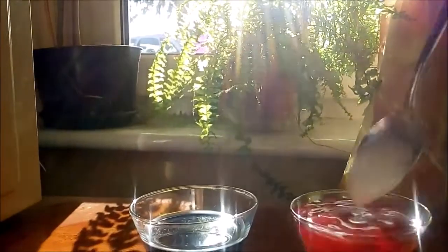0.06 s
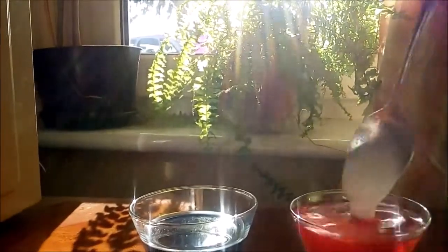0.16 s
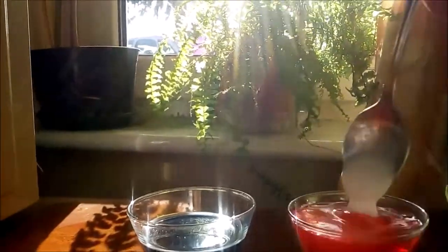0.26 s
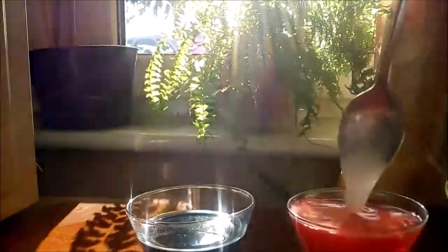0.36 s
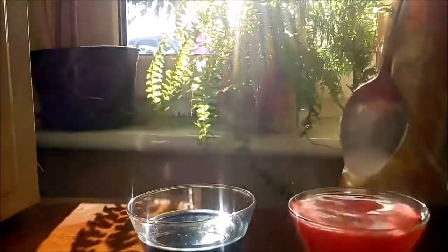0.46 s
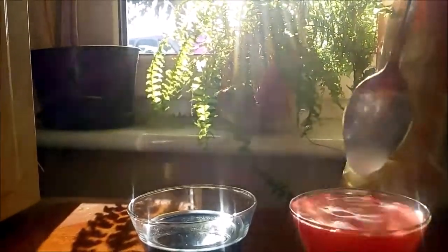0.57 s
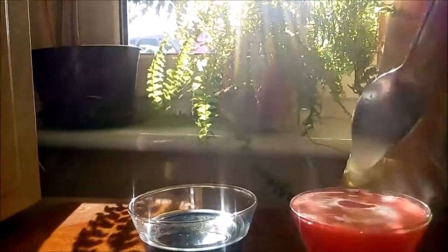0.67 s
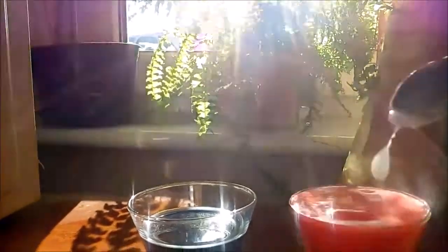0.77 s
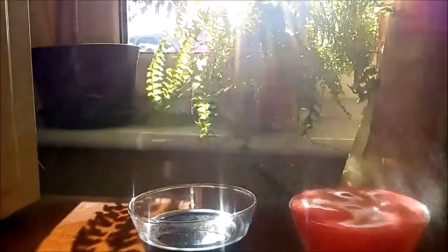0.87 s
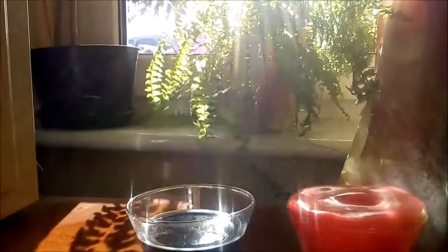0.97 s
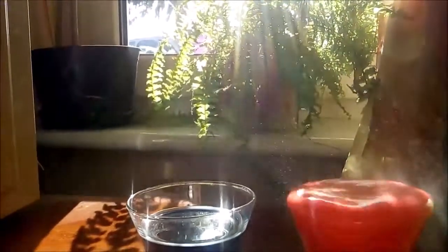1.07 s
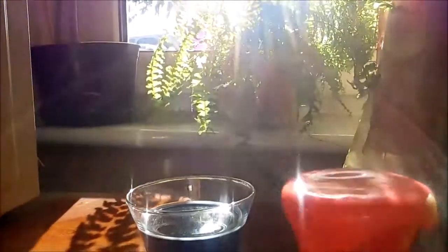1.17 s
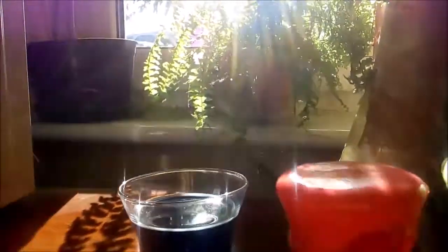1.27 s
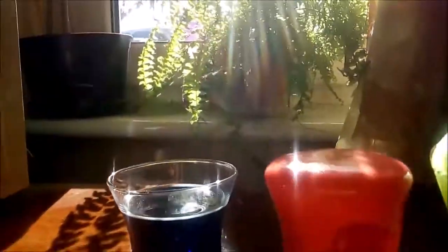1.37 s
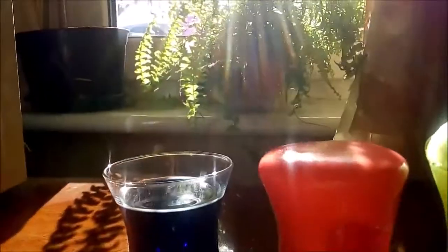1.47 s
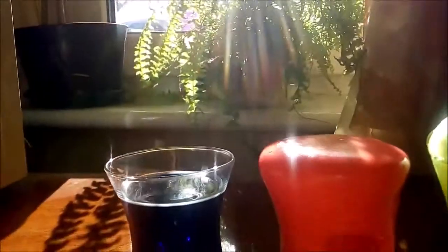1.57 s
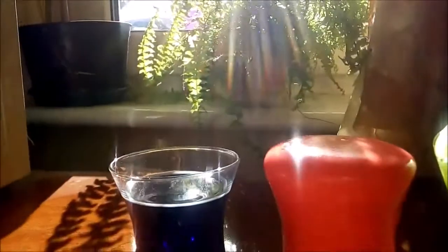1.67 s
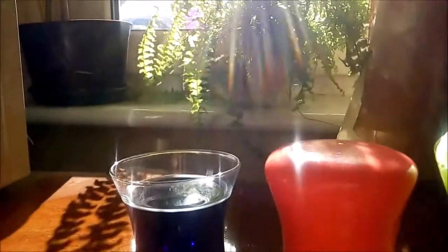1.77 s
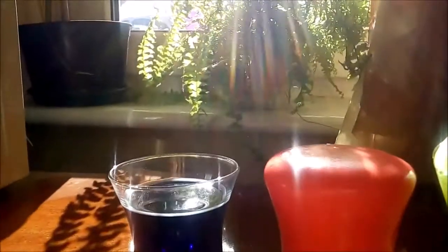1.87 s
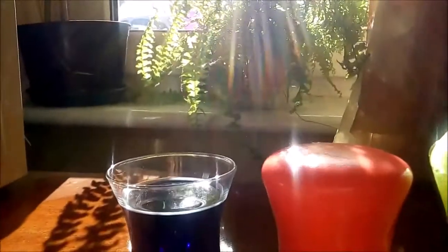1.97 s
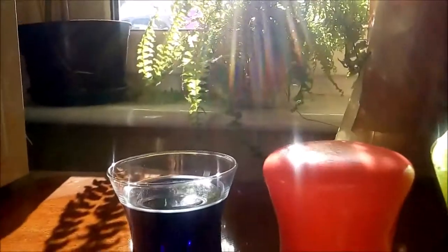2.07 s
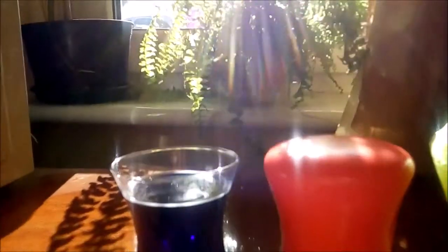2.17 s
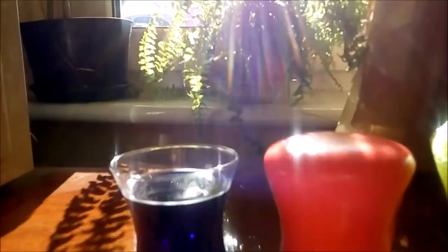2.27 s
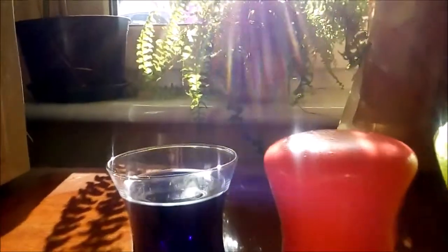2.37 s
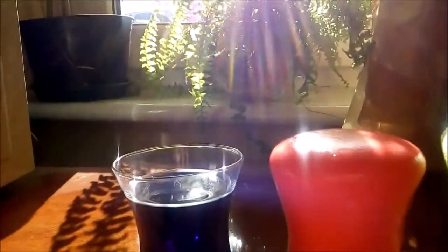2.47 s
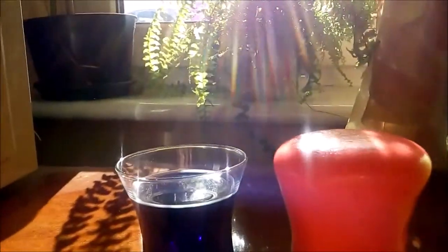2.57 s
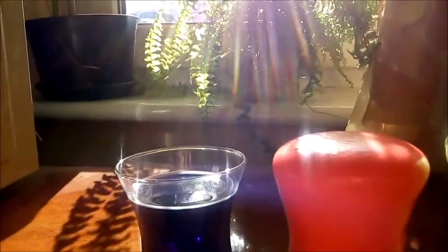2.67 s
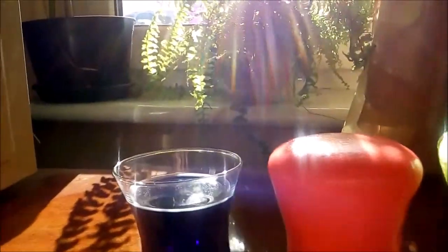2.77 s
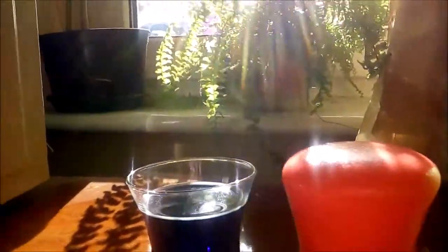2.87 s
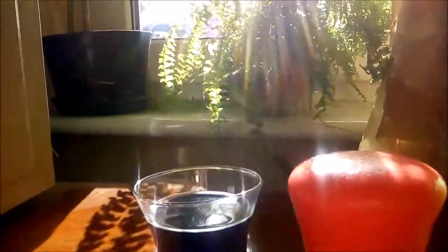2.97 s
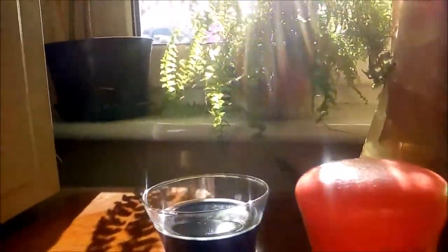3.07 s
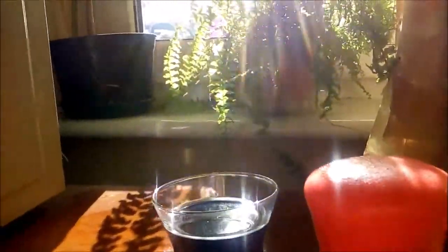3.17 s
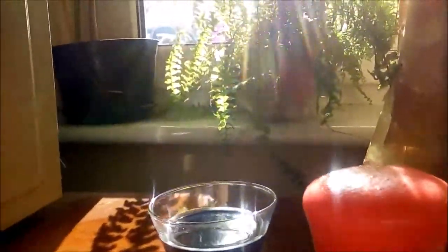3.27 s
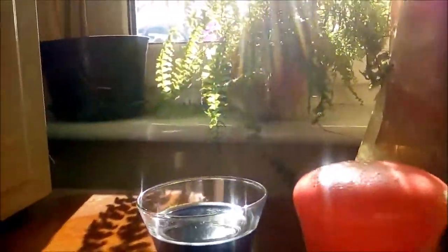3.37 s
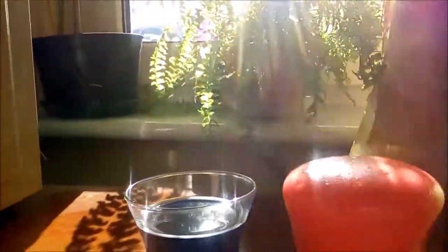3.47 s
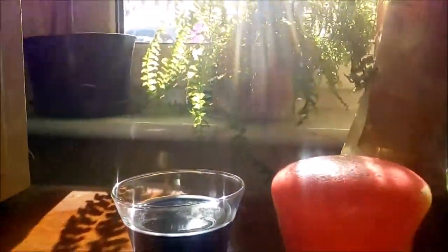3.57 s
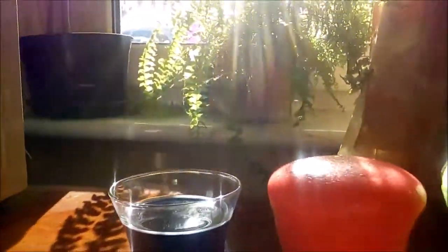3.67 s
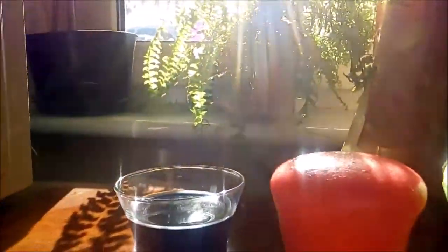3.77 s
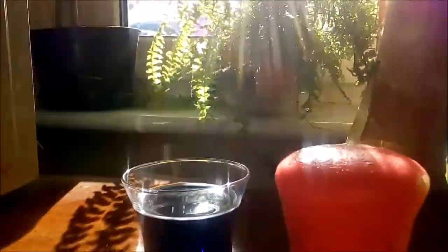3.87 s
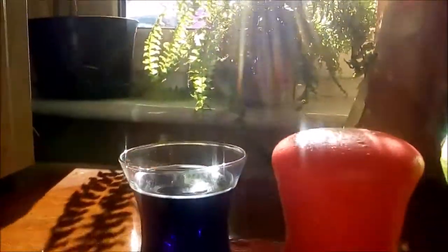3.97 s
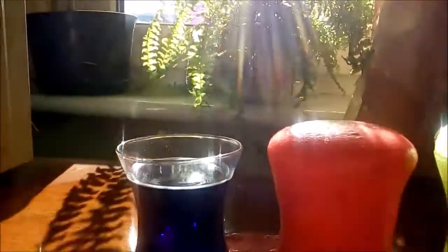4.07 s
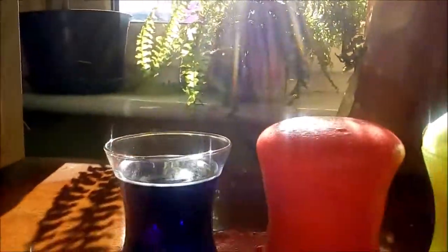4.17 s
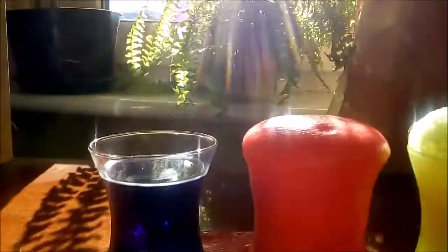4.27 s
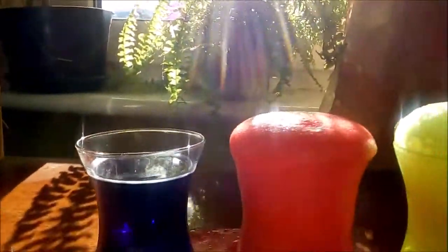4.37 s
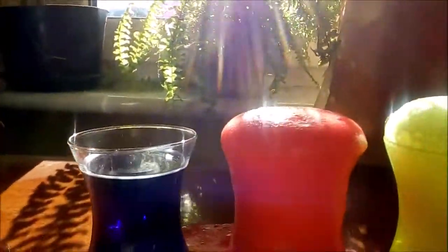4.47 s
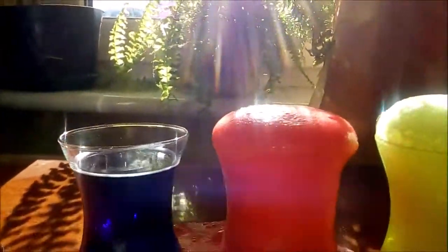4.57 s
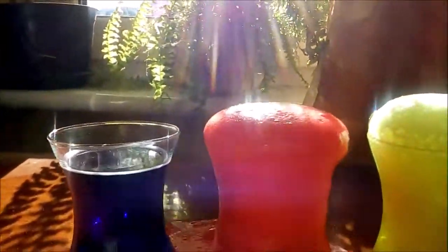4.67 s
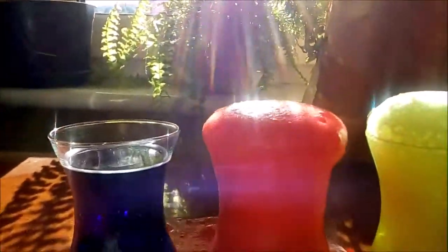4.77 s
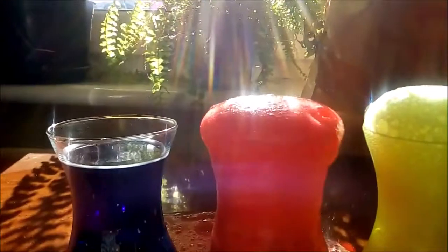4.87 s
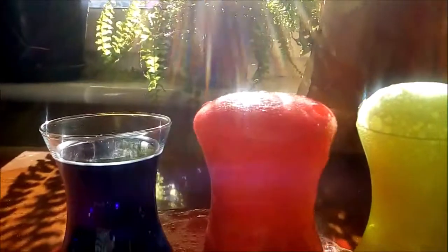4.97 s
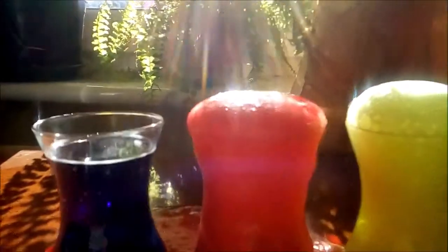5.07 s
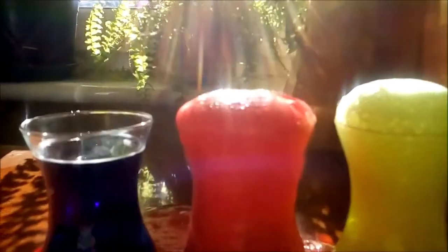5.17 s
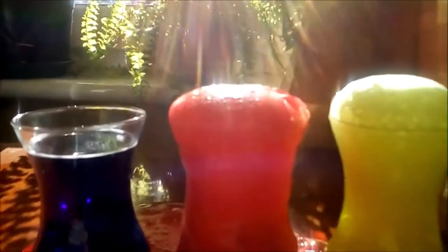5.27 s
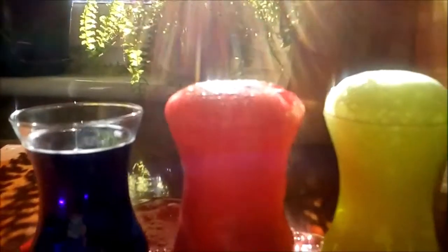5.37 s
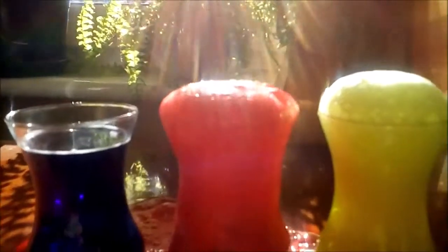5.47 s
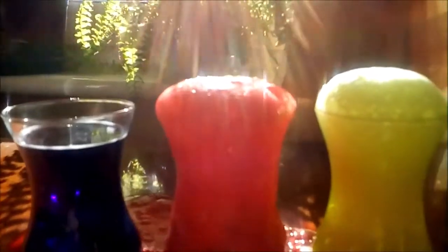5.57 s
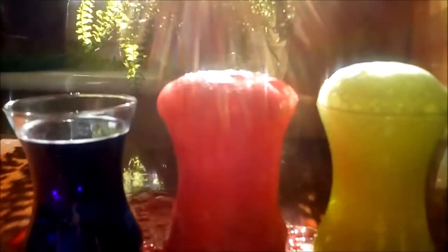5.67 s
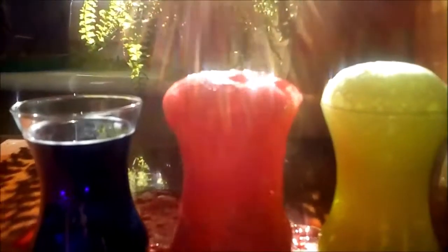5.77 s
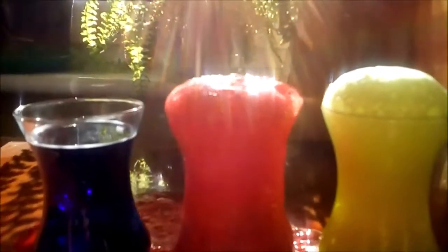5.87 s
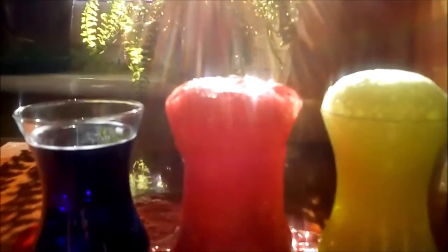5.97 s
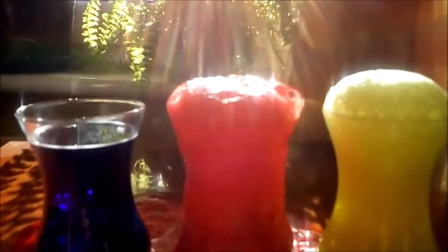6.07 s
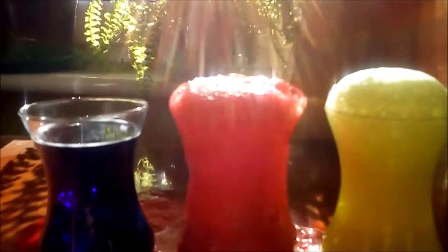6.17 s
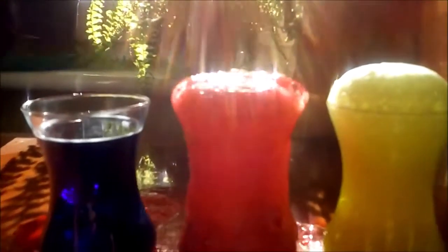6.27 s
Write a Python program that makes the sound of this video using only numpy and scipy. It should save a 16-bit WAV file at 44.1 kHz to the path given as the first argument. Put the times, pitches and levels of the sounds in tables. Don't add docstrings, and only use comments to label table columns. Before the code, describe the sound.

Powder makes liquid foam over with a dense bubbly hiss, while a spoon clatters on wood and fingers bump the camera in a quiet room.

```python
import sys
import numpy as np
from scipy import signal
from scipy.fft import rfft, irfft
from scipy.io import wavfile
from scipy.ndimage import uniform_filter1d

SR = 44100
rng = np.random.default_rng(int(sys.argv[2]) if len(sys.argv) > 2 else 0)


def store_wav(level_fs):
    pcm = np.round(np.clip(np.atleast_2d(level_fs), -1, 1) * 32767)
    wavfile.write(sys.argv[1], SR, pcm.T.astype(np.int16))


def linear_from_db(decibels):
    return 10 ** (np.asarray(decibels, float) / 20)


N = 278712
T = np.arange(N) / SR

# pitch_hz, level_db (per Hz)
ROOM_COLOUR = [(15, -44), (25, -10), (59, -6), (211, -4.5), (333, -8.5), (414, -9.5), (587, -10.5),
               (709, -8.5), (812, -14.5), (1980, -14), (15800, -21.5)]
ROOM_DB = -75
# pitch_hz, t60_s
ROOM_DECAY = [(150, 0.26), (500, 0.29), (1500, 0.21), (3500, 0.092), (8000, 0.077)]

# start_s, peak_db, pitch_hz
KNOCKS = [(1.448, -57, 60), (2.918, -67, 60.3), (3.229, -52, 246), (3.243, -51, 146), (3.781, -64, 140),
          (4.229, -54, 188), (4.258, -43, 397), (4.447, -35, 794), (4.457, -54, 150), (4.462, -52, 600),
          (4.51, -53.5, 135), (4.32, -58, 132), (1.459, -52.5, 125), (3.101, -63, 131), (4.478, -41, 387),
          (4.496, -40, 374), (4.513, -46, 500), (4.547, -49, 425), (4.604, -52, 440), (4.782, -46, 1140),
          (4.833, -36, 880), (4.845, -46, 326), (4.885, -35.5, 338), (4.91, -46, 515), (4.947, -55, 288)]
# start_s, length_s, level_db
RUBS = [
    (1.414, 0.13, -63),
    (2.15, 0.29, -68.5),
    (2.993, 0.73, -72.5),
    (4.202, 0.61, -68.5),
    (4.75, 0.29, -63),
]
SHELL_HZ, SHELL_T60_S, SHELL_DAMPING = 350, 0.033, .65
CLICK_DB, SOFT_DB_PER_OCTAVE, LOUDEST_CLICK_DB = -5.5, 14, -45.5

# start_s, peak_db, pitch_hz
RINGING_BURSTS = [
    (4.319, -38.5, 2380),
    (4.496, -42.5, 1060),
    (4.496, -44, 1600),
    (4.8852, -38, 2560),
    (4.947, -42, 1920),
    (5.217, -27, 6730),
    (5.2206, -33, 6350),
    (5.223, -39, 6430),
    (5.3, -48, 2270),
]

# start_s, peak_db, steel_db, drum_db (drum against knock)
BOUNCES = [
    (.968, -51.5, -4, -9),
    (1.446, -21, -11.5, -7.5),
    (1.661, -45.5, 10.5, -6.5),
    (1.8326, -23, 6, -4.5),
    (2.112, -58.5, -6, 6.5),
    (2.2451, -27, -3, -13.5),
]
HEEL_S, HEEL_DB, HEEL_STEEL_DB, HEEL_DRUM_DB = .011, -10, -17, 7
# start_s, gap_s, peak_db, steel_db, drum_db
ROCKING = [
    (1.473, .018, -29, -20, -5.5),
    (1.606, 0.015, -40, 1, -20),
    (2.285, .037, -49.5, -13, 10),
]
ROCK_LOSS_DB = 2
# pitch_hz, width_hz, level_db, t60_s
TABLE_MODES = [(230, 30, -10, .15), (285, 40, -2, .2), (340, 60, -2, .14), (405, 50, -3, .16),
               (560, 120, -14, .06), (740, 100, -3, .045), (890, 100, 1.5, .045), (1010, 100, 1.5, .05),
               (1180, 140, -6, .04), (1800, 500, -15, .015)]
# pitch_hz, width_hz, level_db, t60_s
STEEL_MODES = [(2830, 110, -8, 0.047), (3600, 150, 1, 0.025), (4030, 73, 1.5, 0.02), (4560, 140, 1, 0.025),
               (4780, 220, 2.5, 0.0071), (6770, 510, 2, 0.025), (11000, 520, -14.5, 0.018)]
# start_s, length_s, pitch_hz, level_db
SINGING = [
    (1.6, .02, 3650, -43),
    (1.852, .046, 3600, -41),
    (1.51, .075, 11700, -66),
    (1.55, .025, 7000, -53),
    (1.455, .03, 6900, -52),
    (2.255, .008, 6700, -35),
    (1.615, .035, 1130, -47),
    (.97, .04, 1330, -66),
    (1.0, .1, 2800, -74),
]

# start_s, level_db
FIZZ_LEVEL = [(0.0, -79.5), (0.4, -78), (0.54, -68), (0.72, -61), (0.86, -62.5), (1.14, -66.5),
              (1.3, -67.5), (1.42, -60.5), (1.46, -51), (1.62, -52), (2.22, -50.5), (3.13, -48.5),
              (4.98, -49.5), (5.98, -53), (6.32, -53.5)]
# start_s, stage (0 in the glass, 1 at the rim, 2 spilling)
FOAM_HEIGHT = [
    (0, 0.022),
    (1.3, 0.043),
    (1.5, 0.84),
    (2.62, 0.97),
    (2.9, 1.96),
    (3.0, 1.95),
    (4.2, 2.2),
    (4.8, 1.75),
    (5.5, 1.88),
    (6.32, 1.27),
]
# start_s, pitch_hz (lower resonance)
GLASS_AIR = [
    (0, 3900),
    (.7, 3950),
    (.9, 3450),
    (.97, 3930),
    (1.1, 3860),
    (1.25, 3600),
    (1.4, 4440),
]
CAVITY_DB, CAVITY_DB_PER_KHZ = -4, 12
# pitch_hz, level_db (per Hz)
GLASS_COLOUR = [(880, -46), (1500, -29), (1810, -32), (2060, -28), (2220, -19), (3640, -3), (4660, -11),
                (6070, -4.5), (6840, -6), (8000, -23), (15800, -32)]
# pitch_hz, level_db (per Hz)
RIM_COLOUR = [(290, -57), (500, -26.5), (829, -17.5), (1240, -11.5), (1460, -8), (2830, -4), (5660, -1.5),
              (7130, -5), (9120, -17), (15800, -28)]
# pitch_hz, level_db (per Hz)
SPILL_COLOUR = [(150, -48), (400, -30), (800, -15.5), (1300, -6.5), (2200, -1.5), (4000, -1.5),
                (6500, -3.5), (7500, -7), (9000, -13), (11000, -17.5), (13500, -13.5), (15800, -20.5)]
BRIGHT_DB, DEEP_DB, RUMBLE_DB = -2, 1, 1
FOCUS, FOCUS_FROM_DB = 0.4, -58.5
AGEING_S, FINER_DB_PER_S, THINNER_DB_PER_S, DRIER_DB_PER_S = 4.25, 4, -4.5, 5.5
DRY_DELAY_MS, WET_DELAY_MS, DRY_ECHO, WET_ECHO = .45, .18, .07, .52
CREEP_FROM_S, CREEP_PER_S = 4.1, 0.037

STARVED_FRAMES = [.282, .837, .858, .986, 1.178, 1.562, 2.074, 2.416, 2.437, 2.458, 2.501, 2.693, 2.714,
                  3.013, 3.141, 3.333, 5.658, 5.68, 5.765, 5.871, 6.0, 6.128, 6.17, 6.234]
FRAME_S, GRID_S = 1024 / 48000, .0046
STEP_DB, STEP_DB_PER_S, LEAD_DB = 13.3, .3, 1.2
WIDE_FRAMES = [.243, .452, .661, 1.102, 1.706, 2.008, 2.17, 3.262, 3.378, 3.749, 4.353, 4.794, 4.91, 5.328,
               5.514, 5.793, 6.28]
WIDE_DB = -5


def unit(x):
    return x / np.sqrt(np.mean(x ** 2) + 1e-20)


def along(points, hz):
    f, v = np.transpose(points)
    return np.interp(np.log(hz + 1), np.log(f + 1), v)


def curves(rows, t):
    s, *cols = np.transpose(rows)
    return [np.interp(t, s, c) for c in cols]


def add(track, s, sound):
    part = track[round(s * SR):][:len(sound)]
    part += sound[:len(part)]


def ring(modes, scatter_db, attack):
    hz, db, t60 = np.transpose(modes)[:, :, None]
    t = T[:round(t60.max() * SR)]
    level = linear_from_db(db + scatter_db * rng.standard_normal(db.shape) - 60 * t / t60)
    tones = level * np.sin(2 * np.pi * hz * t)
    return tones.sum(axis=0) * (1 - np.exp(-t / attack)) / np.sqrt(len(modes))


def thud(body, scatter_db, attack):
    crowd = [(hz + width * rng.normal(0, .5), db, t60) for hz, width, db, t60 in body for _ in range(4)]
    return ring(crowd, scatter_db, attack)


def snap(low_hz, high_hz, t60):
    band = signal.butter(3, [low_hz, high_hz], "band", fs=SR, output="sos")
    t = T[:SR // 20]
    return signal.sosfilt(band, linear_from_db(-60 * t / t60) * rng.standard_normal(len(t)))


def room_tone():
    hz = np.fft.rfftfreq(N, 1 / SR)
    spectrum = rfft(rng.standard_normal(N)) * linear_from_db(along(ROOM_COLOUR, hz))
    return linear_from_db(ROOM_DB) * unit(irfft(spectrum, N))


def walls(x):
    hz, t, z = signal.stft(rng.standard_normal(SR // 2), SR, nperseg=256)
    decay = linear_from_db(-60 * t / along(ROOM_DECAY, hz)[:, None])
    tail = signal.istft(z * decay, SR, nperseg=256)[1]
    return signal.fftconvolve(np.pad(x, (200, 0)), tail / np.linalg.norm(tail))[:N]


def grip():
    out = np.zeros(N)
    band = signal.butter(2, [160, 950], "band", fs=SR, output="sos")
    skin = unit(signal.sosfilt(band, rng.standard_normal(N)))
    for s, length, db in RUBS:
        t = T[:round(length * SR)]
        add(out, s, linear_from_db(db) * np.sin(np.pi * t / length) ** 2 * skin[round(s * SR):][:len(t)])
    for s, db, hz in KNOCKS:
        t60 = SHELL_T60_S * (SHELL_HZ / hz) ** SHELL_DAMPING
        shell = [(hz, 0.13 * hz, 0, t60), (2.26 * hz, 0.78 * hz, -6, .5 * t60)]
        small = signal.butter(2, 0.34 * hz, "high", fs=SR, output="sos")
        knock = signal.sosfilt(small, thud(shell, scatter_db=-2.5, attack=0.00048))
        add(out, s, linear_from_db(db - 4.5) * knock)
        click_db = CLICK_DB + SOFT_DB_PER_OCTAVE * min(np.log2(hz / SHELL_HZ), 0)
        click_db = min(db + click_db, LOUDEST_CLICK_DB)
        add(out, s, linear_from_db(click_db + 14.5) * snap(low_hz=690, high_hz=3050, t60=0.019))
    return out


def spoon():
    out = np.zeros(N)
    heels = [(s + HEEL_S, db + HEEL_DB, steel + HEEL_STEEL_DB, drum + HEEL_DRUM_DB)
             for s, db, steel, drum in BOUNCES]
    rocks = [(s + k * gap, db - k * ROCK_LOSS_DB, steel, drum)
             for s, gap, db, steel, drum in ROCKING for k in range(4)]
    for s, db, steel_db, drum_db in BOUNCES + heels + rocks:
        wood = [(hz, width, level + drum_db * (hz < 500), t60) for hz, width, level, t60 in TABLE_MODES]
        add(out, s, linear_from_db(db - 6) * thud(wood, scatter_db=-2.5, attack=0.0009))
        add(out, s, linear_from_db(db + steel_db - 5.5) * thud(STEEL_MODES, scatter_db=1.5, attack=0.00028))
        add(out, s, linear_from_db(db + steel_db - 4) * snap(low_hz=2800, high_hz=7000, t60=.007))
    for s, length, hz, db in SINGING:
        t = T[:round(length * SR)]
        swell = np.sin(np.pi * t / length) ** 0.94
        flutter = 1 + 0.81 * np.sin(2 * np.pi * 130 * t)
        add(out, s, linear_from_db(db - 4.5) * swell * flutter * np.sin(2 * np.pi * hz * t))
    return out


def pops():
    out = np.zeros(N)
    for s, db, hz in RINGING_BURSTS:
        burst = ring([(hz, 3, 40 / hz), (hz * .45, -9, 12 / hz)], scatter_db=1, attack=.0001)
        add(out, s, linear_from_db(db) * burst)
    return out


def bubbles(per_s, cycles, spread_db):
    draw = rng.random((30000, 3))
    start = np.cumsum(-np.log(1 - draw[:, 0])) * SR / per_s
    draw, start = draw[start < N], start[start < N].astype(int)
    hz = 700 + 14500 * draw[:, 1:2]
    k = np.arange(96)
    turns = hz * k / SR
    size = linear_from_db(-spread_db * np.log(1.003 - draw[:, 2:])) * np.sqrt(hz)
    grains = size * np.exp(-turns / cycles) * np.sin(2 * np.pi * turns)
    return unit(np.bincount((start[:, None] + k).ravel(), grains.ravel(), N + 96)[:N])


def foam_colour(hz, t, level_db, stage, wet):
    age = np.maximum(t - AGEING_S, 0)
    creep = 1 + wet * CREEP_PER_S * (t - CREEP_FROM_S)
    slid_hz = hz / creep ** np.clip(hz / 3000 - 2, 0, 1)
    rim, spill = along(RIM_COLOUR, slid_hz), along(SPILL_COLOUR, slid_hz)

    cavity_hz, = curves(GLASS_AIR, t)
    cavity_db = CAVITY_DB + CAVITY_DB_PER_KHZ * np.abs(3900 - cavity_hz) / 1000
    lower = np.clip((5600 - hz) / 1000, 0, 1)
    glass = along(GLASS_COLOUR, hz * (3700 / cavity_hz) ** lower) + cavity_db * lower
    colour_db = glass + np.clip(stage, 0, 1) * (rim - glass) + np.clip(stage - 1, 0, 1) * (spill - rim)

    focus_db = -FOCUS * (level_db - FOCUS_FROM_DB).clip(-4) * np.clip(1 - stage, 0, 1)
    bright_db = BRIGHT_DB + focus_db
    deep_db = DEEP_DB + THINNER_DB_PER_S * age + focus_db
    rumble_db = RUMBLE_DB + DRIER_DB_PER_S * age
    colour_db = colour_db + bright_db * np.clip(np.log2(hz / 7000 + 1e-9), 0, 1)
    colour_db = colour_db + deep_db * np.clip(np.log2(2200 / (hz + 1)), 0, 1)
    colour_db = colour_db + FINER_DB_PER_S * age * np.clip(np.log2(slid_hz / 9000 + 1e-9) / 0.32, 0, 1)
    return colour_db + rumble_db * np.clip(np.log2(900 / (hz + 1)), 0, 1)


def table_echo(hz, t, wet):
    creep = 1 + wet * CREEP_PER_S * (t - CREEP_FROM_S)
    delay_ms = (DRY_DELAY_MS + wet * (WET_DELAY_MS - DRY_DELAY_MS)) / creep
    echo = np.clip(DRY_ECHO + wet * (WET_ECHO - DRY_ECHO), 0, .95)
    softened = echo / (1 + (hz * delay_ms / 2300) ** 8)
    return 1 + softened * np.exp(1j * (1.26 - 2 * np.pi * hz * delay_ms / 1000))


def fizz():
    crowd = rng.standard_normal(N) + linear_from_db(-7) * bubbles(per_s=3000, cycles=1.5, spread_db=2)
    hz, t, z = signal.stft(crowd, SR, nperseg=512)
    z = z / uniform_filter1d(np.sqrt(np.mean(np.abs(z) ** 2, axis=1)), size=9)[:, None]
    hz = hz[:, None]
    (level_db,), (stage,) = curves(FIZZ_LEVEL, t), curves(FOAM_HEIGHT, t)
    wet = np.maximum.accumulate(np.clip(stage - 1, 0, 1))
    gain = linear_from_db(foam_colour(hz, t, level_db, stage, wet)) * table_echo(hz, t, wet)

    patches = uniform_filter1d(rng.standard_normal(z.shape), size=7, axis=0)
    patches = uniform_filter1d(patches, size=10, axis=1)
    patchy_db = 0.77 + 1.6 * np.clip(1 - stage, 0, 1)
    band = (hz[:, 0] > 2500) & (hz[:, 0] < 7500)
    strength = np.sqrt(np.sum(np.abs(gain[band]) ** 2, axis=0))
    gain = gain * linear_from_db(level_db + patchy_db * unit(patches)) / strength
    return linear_from_db(-1.3) * signal.istft(z * gain, SR, nperseg=512)[1][:N]


def scene():
    taps = signal.sosfilt(signal.butter(6, 225, "high", fs=SR, output="sos"), spoon())
    hand = grip()
    reverb = linear_from_db(-9.5) * walls(taps + linear_from_db(-3) * hand)
    mono = room_tone() + reverb + hand + taps + pops() + fizz()
    return np.array([mono, mono])


def lapped(window):
    m = len(window) // 2
    n, k = np.arange(2 * m), np.arange(m)[:, None]
    return np.sqrt(2 / m) * window * np.cos(np.pi / m * (n + .5 + m / 2) * (k + .5))


def starve(x, follow, ceiling_hz):
    m = round(FRAME_S * SR)
    basis = lapped(np.sin(np.pi * (np.arange(2 * m) + .5) / (2 * m)))
    line_hz = np.arange(m) * SR / (2 * m)
    out = x.copy()
    for s in STARVED_FRAMES:
        start = (round((s - GRID_S) / FRAME_S) - 1) * m + round(GRID_S * SR)
        lines = basis @ x[start:start + 2 * m]
        ahead = sum(s < later < s + 2.5 * FRAME_S for later in STARVED_FRAMES)
        near = np.sqrt(np.abs(uniform_filter1d(lines ** 2, size=40)) + 1e-20)
        overall = np.sqrt(np.mean(lines ** 2))
        step_db = STEP_DB + STEP_DB_PER_S * s - LEAD_DB * ahead ** 2
        step = linear_from_db(step_db) * near ** follow * overall ** (1 - follow)
        kept = np.where(line_hz < ceiling_hz, np.round(lines / step) * step, lines)
        out[start:start + 2 * m] += (kept - lines) @ basis
    return out


def wide_noise(x):
    out, hz = np.zeros(N + 2048), (np.arange(1024) + .5) * SR / 2048
    basis = lapped(signal.windows.kaiser_bessel_derived(2048, 4 * np.pi))
    padded = np.pad(x, (0, 2048))
    for s in WIDE_FRAMES:
        start = round((s * SR - 524) / 1024 - 1) * 1024 + 524
        lines = basis @ padded[start:start + 2048]
        low_hz = 4200 * 3.2 ** rng.random() ** 1.3
        band = (hz > low_hz) & (hz < low_hz + 1200)
        noise = rng.standard_normal(len(hz)) * band * np.sqrt(np.mean(lines[band] ** 2))
        add(out, start / SR, linear_from_db(WIDE_DB) * noise @ basis)
    return out[:N]


def low_pass(x):
    return signal.sosfilt(signal.butter(12, 15940, fs=SR, output="sos"), x)


def record(dry):
    passed = np.fft.rfftfreq(N, 1 / SR) < 15900
    mono = starve(irfft(rfft(dry[0]) * passed, N), follow=.45, ceiling_hz=15100)
    side = wide_noise(mono)
    return low_pass(np.array([mono + side, mono - side]))


dry = scene()
out = record(dry)
store_wav(out)
```